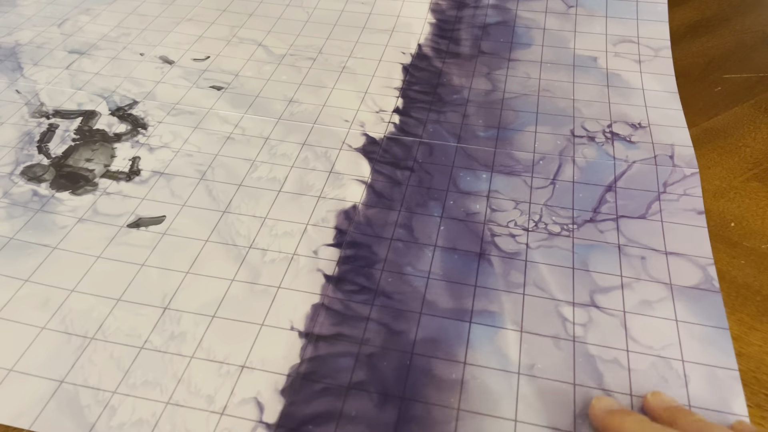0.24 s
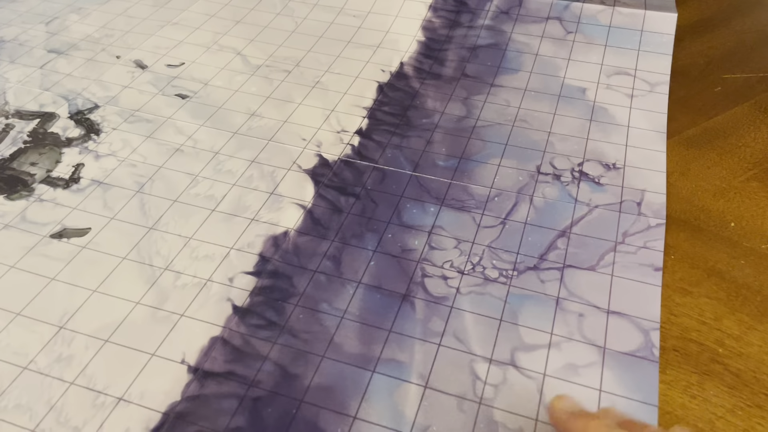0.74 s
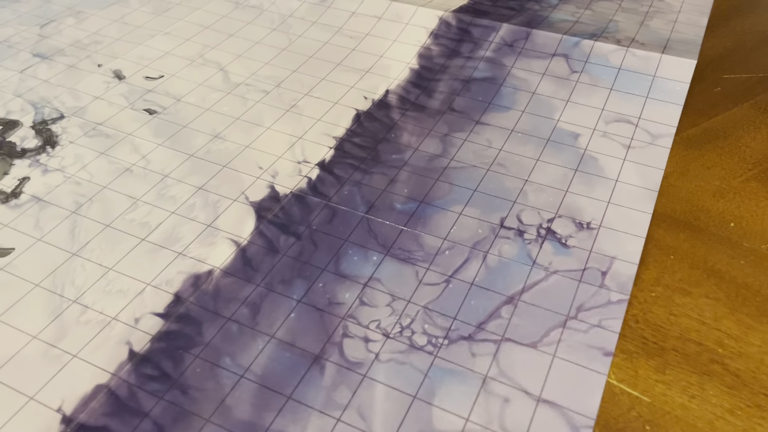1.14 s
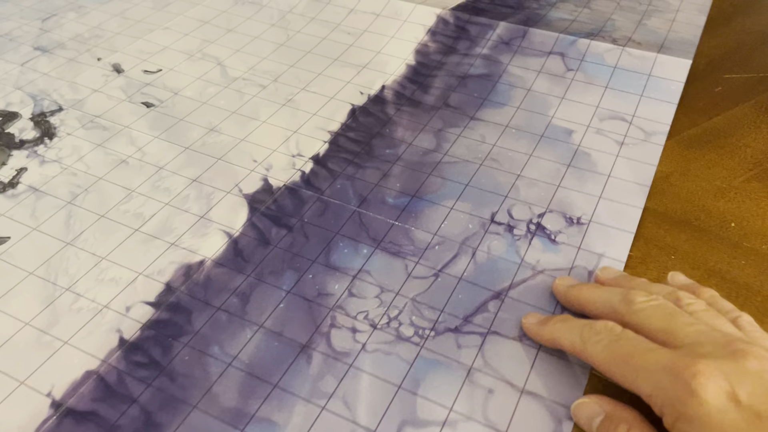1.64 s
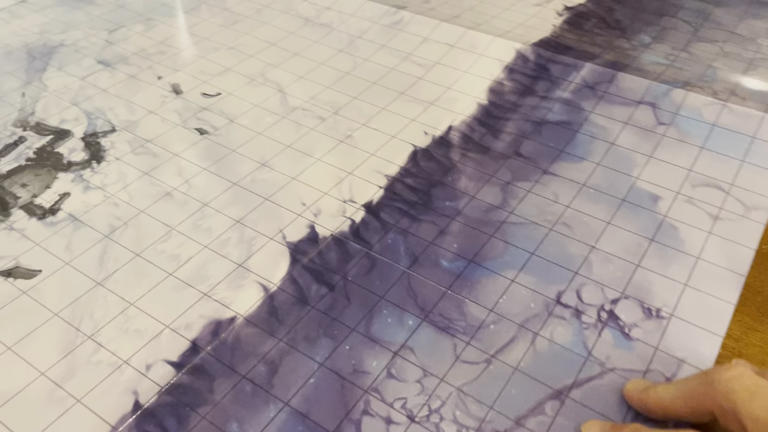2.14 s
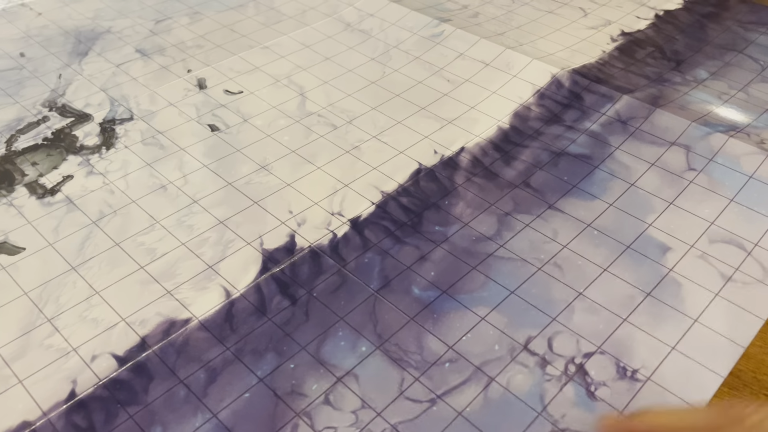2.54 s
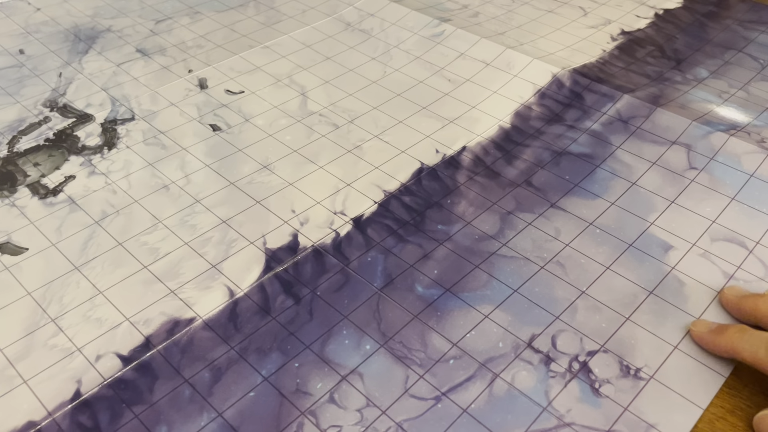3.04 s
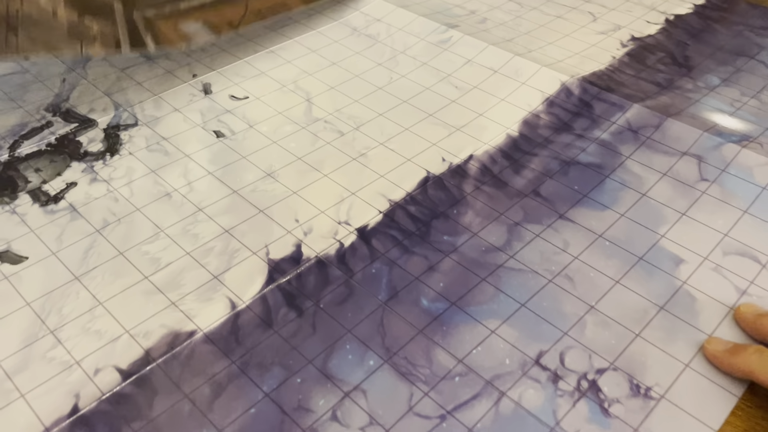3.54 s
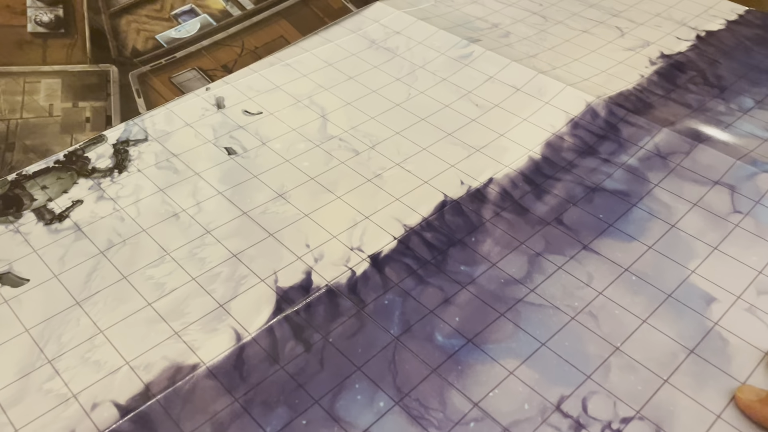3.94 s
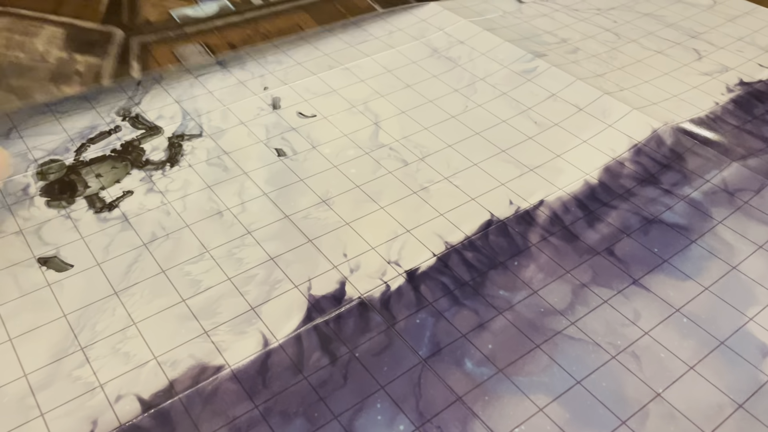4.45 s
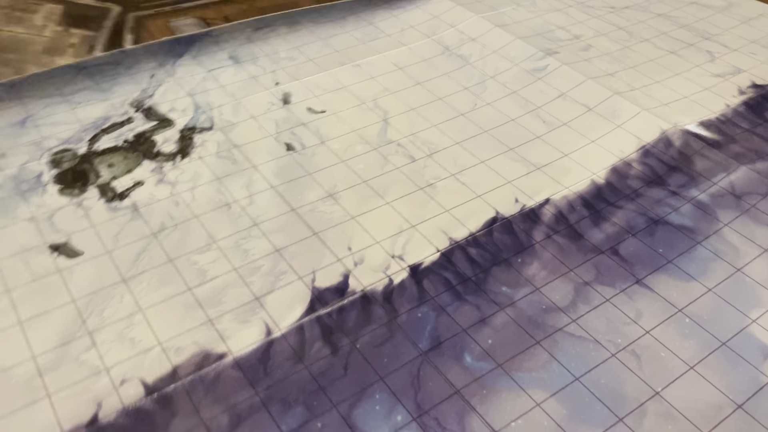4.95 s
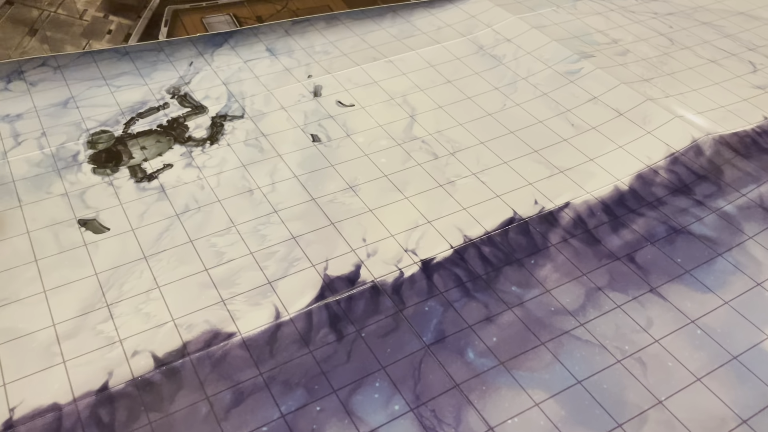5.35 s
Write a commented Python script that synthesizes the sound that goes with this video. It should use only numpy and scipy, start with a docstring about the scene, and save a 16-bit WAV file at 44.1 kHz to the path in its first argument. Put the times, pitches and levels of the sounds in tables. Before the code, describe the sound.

Stereo close recording of thick coated paper being pushed flat on a table. Soft hissing strokes with faint crinkles lead to a dull panel flip, a near-quiet pause, then a sharp crackling buckle with deep wobble. Sliding resumes with tiny skin-on-gloss squeaks, several smaller pops and thuds, and a crisp short swipe before it fades. Small room, faint low background.

```python
"""Small room, wooden table: a hand slides and presses a large, stiff, glossy paper map under a phone.
Sliding: random grains, coloured into hiss, sheen, fizz and drone; hard drags add gliding noise bands.
Bending: low grains wobble. Creases: noise bursts, ringing panels, sagging flaps, runs of crinkle pings.
Kinks ping, panels flip with a falling thump, bumps thud; brief squeaks are stick-slip pulse trains.
A short diffuse tail and a faint indoor background go with them into two microphones."""
import sys
import numpy as np
from scipy import signal
from scipy.fft import rfft, irfft, next_fast_len
from scipy.io import wavfile
from scipy.ndimage import uniform_filter1d, map_coordinates

SR = 44100
rng = np.random.default_rng(int(sys.argv[2]) if len(sys.argv) > 2 else 0)


def transcribe(signal):
    """Save signal, clipped to [-1, 1], as a 16-bit WAV file at the path in sys.argv[1]."""
    frames = np.atleast_2d(signal).T
    limited = np.clip(frames, -1, 1)
    pcm = np.round(limited * 32767).astype(np.int16)
    wavfile.write(sys.argv[1], SR, pcm)


N = 246959
TIME_S = np.arange(N) / SR
TAPS = 4096
FILTER_HZ = np.maximum(np.arange(TAPS + 1) * SR / (2 * TAPS), 1)
TOP_HZ, QUIET_DB = 14400, -62.5

# Event levels stand before any trim named in the function that plays them.
# pushes and brushes: start/s, end/s, attack/s, release/s, hiss level/dB,
# swell over stroke/dB (times growth), fizz level/dB, drone level/dB, sheen level/dB
STROKES = [(-0.02, 0.112, .02, 0.12, -52.5, -2, -47.5, -56.5, -58.5),
           (0.112, 0.307, 0.033, 0.028, -79.5, -3, -72.5, -98, -77.5),
           (0.249, 0.669, 0.18, 0.049, -56, -17.5, -56.5, -59, -58.5),
           (0.693, 0.824, .02, 0.02, -82, -13, -74, -100, -79.5),
           (0.774, 1.175, 0.22, 0.11, -52, 4, -58.5, -58, -57),
           (1.13, 1.347, 0.056, 0.036, -77, -11, -75, -84, -76.5),
           (1.344, 1.507, .03, 0.0183, -81, -8, -79, -86, -80),
           (1.464, 1.612, 0.12, 0.056, -56, 9, -65.5, -60.5, -57),
           (1.553, 2.32, 0.41, 0.11, -52.5, -4.5, -56.5, -55.5, -53.5),
           (2.056, 2.574, 0.15, 0.063, -54, 2.5, -59.5, -55.5, -52),
           (2.872, 3.137, 0.071, 0.0524, -76.5, 9, -82, -71, -88),
           (3.217, 3.362, 0.044, 0.034, -76.5, -3, -82, -72.5, -92),
           (3.33, 3.5, 0.099, 0.091, -67, -15, -73, -57, -74),
           (3.397, 4.18, 0.15, 0.45, -56.5, 11, -63.5, -54.5, -60),
           (3.933, 4.538, 0.32, 0.19, -53.5, -1, -59, -56.5, -53.5),
           (4.298, 4.473, 0.022, 0.064, -72, -9, -83, -55, -66),
           (4.543, 4.78, 0.034, 0.05, -70, -6, -86, -61.5, -85),
           (4.81, 4.904, 0.015, 0.05, -68.5, -4, -86, -65, -75),
           (4.887, 5.171, 0.069, 0.074, -46, -4, -50.5, -59, -47),
           (5.18, 5.354, 0.034, 0.042, -60, 4, -74, -73.5, -83),
           (5.322, 5.485, 0.039, 0.043, -68.5, 3, -80.5, -91, -79.5),
           (5.528, 5.65, 0.024, .03, -87, 5, -70.5, -95, -79)]
# power of the push for hiss, fizz, drone, sheen [1]: drone comes up first, fizz last
PUSH_GROWTH = (1.08, 1.31, 0.61, 1.13)
# bending of the whole sheet: t/s, level/dB
BENDING_LEVEL = [(0.0, -87), (0.3, -62), (0.5, -58.5), (0.8, -71), (1.04, -62.5), (1.36, -71), (2.1, -57.5),
                 (2.5, -60), (2.78, -73), (2.95, -53.5), (3.18, -62.5), (3.65, -47.5), (4.15, -77),
                 (4.44, -52), (4.65, -53), (5.22, -60), (5.38, -74), (5.6, -72.5)]
# panels flipping over: t/s, length/s, peak level/dB, first f/Hz, f approached/Hz, fall time/s
FLIPS = [(0.0855, 0.0099, -42.5, 700, 160, 0.0031), (1.345, 0.012, -49.5, 1915, 200, 0.0062),
         (1.603, .02, -52, 448, 120, 0.018), (2.5631, 0.028, -26, 1515, 58, 0.0031),
         (3.346, 0.01, -47.5, 1195, 160, 0.00396), (3.519, 0.016, -40, 800, 80, 0.0053),
         (3.8522, 0.02, -25.5, 2200, 162, 0.00351), (4.662, 0.029, -31, 1580, 92, 0.00243)]
# soft bumps on the table: t/s, level/dB, mid-sag f/Hz
BUMPS = [(0.092, -51.5, 189), (0.252, -45, 80), (1.268, -53, 112), (1.359, -52, 130.5), (1.385, -53, 75),
         (2.487, -45, 148), (2.518, -42.5, 112), (2.615, -36.5, 72.5), (2.935, -44, 101),
         (2.999, -47.5, 215), (3.064, -47.5, 175), (3.568, -41.5, 196), (3.853, -30.5, 89),
         (3.862, -36, 301), (4.43, -46, 108), (4.521, -43.5, 100), (4.623, -38.5, 76), (4.622, -49, 285),
         (4.762, -44, 81), (5.075, -44, 203)]
# creases snapping: t/s, crack level/dB, tick level/dB, ring level/dB, flap level/dB,
# mid-sag flap f/Hz, crack f/Hz, ring f/Hz
SNAPS = [(0.238, -64, -60, -61.5, -58, 110, 6040, 520), (0.682, -79, -84, -69.5, -63, 65, 2150, 440),
         (0.817, -64, -80, -63.5, -72, 85.5, 6100, 645), (1.164, -66, -74, -64, -65, 108, 6300, 900),
         (1.344, -60.5, -86, -54.5, -60, 243, 2260, 673), (1.57, -58, -61.5, -61, -55, 92, 5230, 764),
         (1.62, -56, -65, -63, -45, 71, 2460, 689), (2.565, -55.5, -85, -46.5, -47, 88.5, 1400, 710),
         (2.912, -57.5, -69.5, -68, -46, 65, 4730, 473), (2.942, -71, -85, -79, -53, 109, 3200, 450),
         (3.267, -76, -95, -62, -54.5, 129, 1600, 850), (3.343, -63, -81, -55, -51, 204, 2200, 560),
         (3.515, -54, -83, -53, -41, 89, 1940, 430), (3.551, -47, -50.5, -40, -36.5, 258.6, 2910, 947),
         (3.554, -43, -68, -41, -44, 131, 2300, 702), (3.695, -56, -75.5, -52, -44.5, 81.7, 2000, 506),
         (3.705, -50, -72, -47.5, -41.5, 78, 3060, 495), (3.816, -47.5, -60, -53, -54.5, 293, 2383, 430),
         (3.829, -49, -65, -38.5, -41.5, 281, 2200, 592), (3.845, -38.5, -46, -33.5, -33, 297, 3250, 430),
         (3.853, -38.5, -45.5, -30, -33.5, 217.3, 3350, 600),
         (4.574, -56.5, -73, -52.5, -44.5, 132, 4000, 430), (4.595, -56, -68.5, -50, -40.5, 144, 2500, 559),
         (4.661, -43, -58, -39.5, -39, 133, 1630, 534), (4.737, -64, -70, -57.5, -54, 129, 2280, 602),
         (4.812, -54.5, -66, -53, -41, 163, 1630, 462), (5.123, -51, -72, -62, -42.5, 147.6, 2480, 624),
         (5.139, -54.5, -57, -62, -50.5, 183, 5050, 560), (5.538, -80, -65.5, -93, -56.5, 107, 6900, 560)]
# kinks popping: t/s, level/dB, f/Hz, t60/s
POPS = [(0.2385, -59, 10500, .002), (0.251, -61.5, 6550, .003), (0.2507, -55.5, 11000, .002),
        (0.684, -76, 2270, 0.0052), (0.818, -62, 6100, .008), (1.165, -72, 6300, 0.0018),
        (1.167, -62, 870, 0.011), (1.267, -72, 4400, .012), (1.3, -74, 4400, 0.0079),
        (1.345, -59.5, 2390, .012), (1.526, -65, 3840, .004), (1.622, -57, 2430, .014),
        (1.623, -62, 820, .02), (2.5656, -48, 940, .014), (2.943, -64.5, 3250, .01),
        (3.069, -61.5, 1140, .014), (3.269, -66, 840, .014), (3.515, -51.5, 1900, 0.0085),
        (3.553, -42.5, 940, .014), (3.695, -51.5, 1900, .008), (3.812, -51.5, 2700, .015),
        (3.816, -44, 2250, .022), (3.825, -46, 2400, .014), (3.829, -44.5, 735, 0.012),
        (3.8455, -32.5, 3070, 0.0029), (3.8452, -33.5, 660, .016), (3.8453, -43.5, 6400, 0.0025),
        (3.8518, -44.5, 3380, .014), (3.852, -36.5, 974, .018), (4.52, -60.5, 1520, .008),
        (4.575, -60, 4170, 0.0037), (4.621, -62, 2600, .008), (4.6625, -51.5, 5870, 0.0038),
        (4.738, -56.5, 3300, 0.0015), (4.811, -64, 1830, 0.0079)]
# hard drags: start/s, end/s, first f/Hz, last f/Hz, level/dB
RASPS = [(0.25, 0.47, 949, 1080, -66), (1.16, 1.317, 11910, 13300, -71.5), (1.61, 1.899, 2380, 2650, -63.5),
         (1.721, 1.955, 600, 1300, -60), (2.118, 2.28, 5200, 4550, -54.5), (2.12, 2.476, 760, 815, -63.5),
         (3.127, 3.201, 780, 995, -78), (4.101, 4.345, 1177, 1076, -67), (4.141, 4.439, 6600, 6180, -54.5),
         (4.36, 4.442, 1680, 1442, -57), (4.351, 4.442, 930, 968, -57), (4.441, 4.51, 1100, 616, -58),
         (5.164, 5.28, 12500, 11700, -67)]
# creases crinkling: t/s, length/s, level/dB, centre f/Hz
CRINKLES = [(0.801, 0.064, -69.5, 10900), (0.865, 0.065, -58.5, 11000), (1.103, 0.014, -54, 11600),
            (1.339, 0.018, -63, 1130), (3.048, 0.042, -67.5, 2800), (3.057, 0.034, -65, 960),
            (3.389, 0.0366, -65.5, 1120), (3.556, 0.045, -68, 3000), (3.575, .11, -58, 796),
            (3.58, .1, -49.5, 240), (3.695, .004, -53.5, 2000), (3.708, .02, -55.5, 2900),
            (3.815, 0.024, -45, 2490), (3.816, .02, -44, 1450), (3.853, 0.04, -39, 533),
            (3.856, 0.033, -52.5, 2900), (4.309, .04, -52.5, 475), (4.606, .024, -48, 715),
            (4.617, .014, -56, 2400), (4.631, .028, -57.5, 960), (4.668, 0.035, -56, 1760),
            (4.668, 0.042, -53, 520)]
# stick-slip: start/s, length/s, first, middle, last slip rate/Hz, jitter [0-1], level/dB
SQUEAKS = [(3.957, 0.1, 385, 420.4, 558, .025, -45), (4.32, .036, 480, 420, 350, .08, -56.5),
           (4.355, .08, 532, 551, 585, 0.057, -53.5), (4.444, .06, 535, 440, 306, 0.0595, -54)]
# stiff panel resonances: f/Hz, width/Hz, level/dB
PANEL_MODES = [(207, 12, 5), (309.6, 65, 7), (431, 12, 3), (554, 19, 0), (660, 40, -4), (830, 45, -5.5),
               (1076, 38, -2.5)]

# relative spectra, each: f/Hz, level/dB
# fine micro-slips
HISS_SPECTRUM = [(600, -8.5), (1300, 2.5), (1800, -1), (2400, -1), (3400, 1), (5000, -3.5), (7000, -2.5),
                 (8500, -15), (10000, -16.5), (15000, -31.5)]
# sheen over the hiss
SHEEN_SPECTRUM = [(2500, -49.5), (3800, -5.5), (5200, 0), (6500, -5.5), (8000, -4.5), (11000, -26.5)]
# highest treble: fizz and ticks
FIZZ_SPECTRUM = [(5000, -26.5), (7000, -6), (8400, 1), (10500, -2.5), (13000, -6), (15500, -1.5)]
# coarse catches
DRONE_SPECTRUM = [(70, -18.5), (170, 4), (330, -1.5), (480, -2), (780, 1), (1100, -8), (1600, -17.5),
                  (3200, -17), (5000, -43.5)]
# bending sheet
WOBBLE_SPECTRUM = [(20, -49), (38, -8), (62, 5), (85, -6.5), (120, -3), (180, -5.5), (260, -10), (400, -16),
                   (800, -54)]
# crease cracks and grit
CRACK_SPECTRUM = [(700, -34.5), (1400, 3.5), (1900, -3), (2300, 2), (3400, -1), (4000, -0.5), (6300, -3.5),
                  (7500, -4), (10000, -22)]
# ringing panels
RING_SPECTRUM = [(130, -5.5), (300, -1.5), (560, -3.5), (900, -2.5), (1150, -5), (1500, -26.5),
                 (3000, -38.5)]
# squeaks
SQUEAK_SPECTRUM = [(200, -5), (430, 5.5), (850, -4), (1300, -9.5), (1600, -8.5), (1900, -29), (4000, -53)]
# indoor background
QUIET_SPECTRUM = [(20, -3), (40, -6), (75, -0.5), (150, -10), (300, -29), (630, -32), (2000, -41.5),
                  (7000, -46), (15000, -50.5)]

# room tail: f/Hz, reflected level/dB, t60/s
ROOM_BANDS = [(80, -9, 0.13), (251, -11, 0.28), (560, -11.5, 0.22), (1500, -7.5, 0.29), (3080, -11.5, 0.31),
              (6000, -12, 0.26), (13000, -11.5, 0.18)]
# two microphones: f/Hz, likeness [0-1], left minus right/dB
PORTS = [(100, 0.96, 2.5), (300, 0.91, 2.5), (600, 0.47, 5.5), (1110, 0.36, 3.5), (1810, 0.12, 2),
         (3600, 0.66, 3), (5220, 0.38, 4.5), (6230, 0.77, 1.5), (8000, 1, -1), (10400, 0.46, 0),
         (11200, 0.95, 0.5), (13200, 0.9, -1), (14400, 1, 0.5)]
# phase lead of the right channel: f/Hz, lead/rad
RIGHT_LEAD = [(100, 0), (800, -.4), (3800, 0), (5100, -.6), (7000, 1.5), (7800, 3.0), (8600, 3.4),
              (11000, 6.2), (12200, 6.4), (14200, 9.2), (15800, 9.5)]


def undb(db):
    """Decibels to gain."""
    return 10 ** (np.asarray(db) / 20)


def unit(x):
    """Scale to rms 1."""
    return x / np.sqrt(np.mean(x ** 2) + 1e-20)


def energy_10ms(x):
    """Scale to the energy of 10 ms at rms 1."""
    return unit(x) * np.sqrt(SR / 100 / x.shape[-1])


def common(x, apart=0):
    """Two rows: shared by the microphones, and setting them apart."""
    return x * np.array([[1], [apart]])


def colour(x, points):
    """Minimum-phase filter through (f/Hz, level/dB) points; keeps the power of white noise."""
    hz, db = np.transpose(points)
    gain = unit(undb(np.interp(np.log(FILTER_HZ), np.log(hz), db)))
    cepstrum = irfft(np.log(gain))
    cepstrum[1:TAPS] *= 2  # fold to causal
    cepstrum[TAPS + 1:] = 0
    response = irfft(np.exp(rfft(cepstrum)))[:TAPS]
    return signal.oaconvolve(x, response[None], axes=1)[:, :N]


def resonate(x, hz, width_hz):
    """One resonance, gain 1 at its centre."""
    return signal.lfilter(*signal.iirpeak(hz, hz / width_hz, fs=SR), x)


def walk(rate_hz):
    """Random level, rms near 1, sliding linearly to rate_hz new values per second."""
    hold = max(int(SR / rate_hz), 1)
    steps = np.repeat(rng.standard_normal(N // hold + 1), hold)
    return unit(uniform_filter1d(steps, hold)[:N])


def grains(rate_hz, spread_db):
    """Tiny slips of uneven size at random moments, on two unrelated parts of the sheet."""
    hits = rng.random((2, N)) < rate_hz / SR
    sizes = rng.standard_normal((2, N)) * undb(spread_db * rng.standard_normal((2, N)))
    return unit(hits * sizes)


def fade(t, t60_s):
    """Exponential decay from t = 0."""
    return (t >= 0) * undb(-60 * np.maximum(t, 0) / t60_s)


def swell(t, start, end, attack, release):
    """Smooth rise, hold and fall."""
    rise, fall = np.clip([(t - start) / attack, (end - t) / release], 0, 1)
    return rise ** 2 * (3 - 2 * rise) * fall ** 2 * (3 - 2 * fall)


def add(track, start_s, x):
    """Mix x into every row of the track."""
    i = max(int(start_s * SR), 0)
    track[:, i:i + x.shape[-1]] += x[..., :N - i]


def pushes():
    """Strength of hiss, fizz, drone and sheen; overlapping strokes add in power."""
    power = np.zeros((4, N))
    for start, end, attack, release, hiss, swell_db, fizz, drone, sheen in STROKES:
        on = slice(max(int(start * SR), 0), int(end * SR))
        t = TIME_S[on]
        tilt = undb(swell_db * ((t - start) / (end - start) - .5))
        push = swell(t, start, end, attack, release) * tilt
        levels = zip((hiss, fizz, drone, sheen), PUSH_GROWTH)
        power[:, on] += [(undb(db) * push ** growth) ** 2 for db, growth in levels]
    return np.sqrt(power)


def swish(x, lag_s, wander, echo):
    """A glance off the moving sheet adds a late copy; its wandering lag shifts the colour."""
    lag = lag_s * np.exp(wander * walk(4))
    late = np.array([map_coordinates(row, [(TIME_S - lag) * SR], order=1) for row in x])
    return (x + echo * late) / np.sqrt(1 + echo ** 2)


def sliding(hiss_db=-2.5, sheen_db=-3.0, fizz_db=2.0, drone_db=1.0, grit_db=-13,
            judder_db=1.27, drift_db=0.82):
    """Dense micro-slips hiss, gleam and fizz; coarser catches drone and specks of grit scratch."""
    drift = drift_db * np.array([walk(12) for _ in PUSH_GROWTH])
    hiss, fizz, drone, sheen = pushes() * undb(judder_db * walk(45) + drift)
    fine = colour(grains(9000, spread_db=0.5) * hiss * undb(hiss_db), HISS_SPECTRUM)
    grit = colour(grains(74, spread_db=1.0) * hiss * undb(grit_db), CRACK_SPECTRUM)
    gleam = colour(grains(7000, spread_db=0.0) * sheen * undb(sheen_db), SHEEN_SPECTRUM)
    fizzing = colour(grains(14000, spread_db=2.0) * fizz * undb(fizz_db), FIZZ_SPECTRUM)
    coarse = colour(grains(2800, spread_db=1.0) * drone * undb(drone_db), DRONE_SPECTRUM)
    bright = swish(fine + gleam + grit, lag_s=0.001305, wander=0.209, echo=0.44)
    dark = swish(coarse, lag_s=0.003095, wander=0.27, echo=0.39)
    return bright + dark + fizzing


def bending(flutter_db=3.0):
    """The wide sheet wobbles in soft, irregular buckles."""
    level_db = np.interp(TIME_S, *np.transpose(BENDING_LEVEL))
    buckles = grains(1200, spread_db=1.5) * undb(level_db + flutter_db * walk(24))
    return colour(buckles, WOBBLE_SPECTRUM)


def background():
    """Faint steady indoor noise, mostly low."""
    return undb(QUIET_DB) * colour(rng.standard_normal((2, N)), QUIET_SPECTRUM)


def room(x, gap_s=0.0049):
    """Table and walls return a short, diffuse tail: noise with a decay per band."""
    t = np.arange(SR // 3) / SR - gap_s
    hz, db, t60_s = np.transpose(ROOM_BANDS)
    bins = np.log(np.maximum(np.arange(len(t) // 2 + 1) * SR / len(t), 1))
    noise, response = rfft(rng.standard_normal((2, len(t)))), 0
    for k, share in enumerate(np.eye(len(hz))):  # triangular bands
        band = irfft(noise * np.interp(bins, np.log(hz), share), len(t))
        response = response + undb(db[k]) * band * unit(fade(t, t60_s[k]))
    return signal.oaconvolve(x, response / np.sqrt(len(t)), axes=1)[:, :N]


def flipping(rise_share=0.36, release_share=0.53):
    """A flipped panel sends one bending wave: treble arrives first, so it sweeps down to a thump."""
    out = np.zeros((2, N))
    for start, length, level_db, first_hz, last_hz, fall_s in FLIPS:
        t = np.arange(int(length * SR)) / SR
        hz = last_hz + (first_hz - last_hz) / (1 + t / fall_s) ** 2
        shape = np.sqrt(swell(t, 0, length, length * rise_share, length * release_share))
        wave = np.sin(2 * np.pi * np.cumsum(hz) / SR)
        add(out[:1], start, undb(level_db) * shape * wave)
    return out


def flap(t, hz, t60_s=0.18, rise_s=0.0018, sag=0.6, sag_s=0.019, under_db=-10):
    """Paper swings to rest; slow bending waves come late, so its pitch sags."""
    turn = 2 * np.pi * np.cumsum(hz * (1 + sag * (np.exp(-t / sag_s) - .5))) / SR
    swing = np.sin(turn) * fade(t, t60_s)
    under = undb(under_db) * np.sin(0.632 * turn) * fade(t, 2 * t60_s)
    return energy_10ms((swing + under) * (1 - np.exp(-t / rise_s)))


def bumping():
    """The sheet meets the table on a cushion of air: a dull thud without a crack."""
    t, out = np.arange(SR // 4) / SR, np.zeros((2, N))
    for start, level_db, hz in BUMPS:
        thud = flap(t, hz, t60_s=0.11, rise_s=0.0017, sag=0.13)
        add(out, start, undb(level_db) * common(thud))
    return out


def burst(t, t60_s, rattle_db, rattle_t60_s, rise_s=0.00016):
    """A sharp release of noise and the chatter of paper after it."""
    decay = fade(t, t60_s) + undb(rattle_db) * fade(t, rattle_t60_s)
    shape = decay * (1 - np.exp(-t / rise_s))
    return energy_10ms(rng.standard_normal((2, len(t))) * shape)


def lean_left(x, share):
    """Feeding the common row into the other raises the left microphone and lowers the right."""
    return np.array([x[0], share * x[0] + np.sqrt(1 - share ** 2) * x[1]])


def disperse(x, lag_s=0.002044):
    """Bending waves travel as the root of frequency, so lows arrive late."""
    size = next_fast_len(N + TAPS, real=True)
    bins = np.arange(size // 2 + 1) * SR / size
    # lag_s: travel time at 1 kHz; delays count from the 6 kHz arrival
    turns = lag_s * (2 * np.sqrt(1000 * bins) - bins / np.sqrt(6))
    return irfft(rfft(x, size) * np.exp(-2j * np.pi * turns), size)[:, :N]


def snapping(crack_db=-2, pitch_db=2, crack_width_hz=700, tick_db=5.0, ring_db=-3, facet_db=2,
             facet_width_hz=110, modes_db=-1, boom_db=-5.5, boom_hz=76, ring_lag_s=0.00029):
    """Each crease cracks at its own pitch; the panel rings and flaps, the whole sheet booms."""
    t = np.arange(SR // 4) / SR
    cracks, ticks, rings, flaps = np.zeros((4, 2, N))
    for start, crack, tick, ring, swing, flap_hz, crack_hz, ring_hz in SNAPS:
        release = undb(crack + crack_db) * burst(t, 0.012, rattle_db=-12.5, rattle_t60_s=0.13)
        pitched = undb(pitch_db) * resonate(release, crack_hz, crack_width_hz)
        add(cracks, start, release + pitched)
        click = burst(t, 0.012, rattle_db=-9.5, rattle_t60_s=0.088)
        add(ticks, start, undb(tick + tick_db) * click)
        shake = undb(ring + ring_db) * burst(t, 0.043, rattle_db=-22.5, rattle_t60_s=0.15)
        facet = undb(facet_db) * resonate(shake, ring_hz, facet_width_hz)
        add(rings, start + ring_lag_s, shake + facet)
        boom = flap(t, boom_hz, rise_s=0.024, sag=0.2, under_db=-25)
        waves = flap(t, flap_hz) + undb(boom_db) * boom
        add(flaps, start, undb(swing) * common(waves))  # long waves reach both alike
    rings = lean_left(colour(rings, RING_SPECTRUM), share=0.41)
    modes = sum(undb(db) * resonate(rings, hz, width_hz) for hz, width_hz, db in PANEL_MODES)
    travelled = disperse(colour(cracks, CRACK_SPECTRUM) + rings + undb(modes_db) * modes)
    return travelled + colour(ticks, FIZZ_SPECTRUM) + flaps


def popping(apart=0.3):
    """One kink pops through and rings a small facet as a short decaying sine."""
    t, out = np.arange(SR // 25) / SR, np.zeros((2, N))
    for start, level_db, hz, t60_s in POPS:
        ping = energy_10ms(np.sin(2 * np.pi * hz * t) * fade(t, t60_s))
        add(out, start, undb(level_db) * common(ping, apart))
    return out


def rasping(width_share=0.206, rough_db=3.0, edge_share=0.34):
    """Where the sheet drags hard, the contact patch rings; pitch glides as it grows or shrinks."""
    out, grip = np.zeros((2, N)), undb(rough_db * walk(110))
    for start, end, first_hz, last_hz, level_db in RASPS:
        on = slice(int(start * SR), int(end * SR))
        t, length = TIME_S[on], end - start
        hz = first_hz * (last_hz / first_hz) ** ((t - start) / length)
        lowpass = signal.butter(2, width_share * first_hz / 2, fs=SR, output="sos")
        band = signal.sosfilt(lowpass, rng.standard_normal((2, 2, len(hz))))
        carrier = np.exp(2j * np.pi * np.cumsum(hz) / SR)
        ring = np.real((band[0] + 1j * band[1]) * carrier)
        shape = swell(t, start, end, length * edge_share, length * edge_share)
        out[:, on] += unit(ring * grip[on]) * undb(level_db) * shape
    return out


def crinkling(rate_hz=900, cycles=10, pitch_spread=0.27, size_spread_db=4, fall_db=6, trim_db=-1.5):
    """A fold gives way in a weakening run of tiny buckles; each rings its own facet of paper."""
    t, out = np.arange(SR // 50) / SR, np.zeros((2, N))
    for start, length, level_db, centre_hz in CRINKLES:
        count = max(int(rate_hz * length), 1)
        for k, (late, pitch, size, side) in enumerate(rng.standard_normal((count, 4))):
            hz = min(centre_hz * np.exp(pitch_spread * pitch), .35 * SR)
            ping = unit(np.sin(2 * np.pi * hz * t) * fade(t, cycles / hz))
            ping = ping / np.sqrt(rate_hz * t[-1])  # level holds over the whole run
            moment = start + length * (k + .5 + late / 2) / count
            ping_db = level_db + trim_db + size_spread_db * size - fall_db * (k / count - .5)
            add(out, moment, undb(ping_db) * common(ping, side))
    return out


def squeaking(patchy_db=2.0, edge_share=0.28):
    """The glossy surface sticks and slips: filtered slip impulses whose rate follows a curve."""
    out, wobble, grip = np.zeros((2, N)), walk(300), undb(patchy_db * walk(70))
    for start, length, first_hz, middle_hz, last_hz, jitter, level_db in SQUEAKS:
        on = slice(int(start * SR), int((start + length) * SR))
        t = TIME_S[on]
        bend = np.polyfit([0, .5, 1], [first_hz, middle_hz, last_hz], 2)
        hz = np.polyval(bend, (t - start) / length)
        phase = np.cumsum(hz * (1 + jitter * wobble[on])) / SR
        slips = np.diff(np.floor(phase), prepend=0)  # one impulse per slip
        shape = swell(t, start, start + length, length * edge_share, length * edge_share)
        out[0, on] += unit(slips - hz / SR) * undb(level_db) * shape * grip[on]
    return colour(out, SQUEAK_SPECTRUM)


def microphones(x):
    """First row reaches both, second sets them apart; a fixed right-channel lead widens the treble."""
    size = next_fast_len(N + TAPS, real=True)
    bins = np.arange(size // 2 + 1) * SR / size
    hz, *columns = np.transpose(PORTS)
    likeness, lean_db = (np.interp(bins, hz, c) for c in columns)
    likeness = np.clip(likeness, 0, 1)
    shares = np.sqrt(np.array([1 + likeness, 1 - likeness]) / 2)
    shared, apart = rfft(x, size) * shares
    lead_rad = np.interp(bins, *np.transpose(RIGHT_LEAD))
    left = (shared + apart) * undb(lean_db / 2)
    right = (shared - apart) * undb(-lean_db / 2) * np.exp(1j * lead_rad)
    return irfft(np.array([left, right]), size)[:, :N]


def scene():
    """Sheet, room tail and background, as a shared and a differing row, into two microphones."""
    sheet = sliding() + bending() + flipping() + bumping() + snapping()
    sheet = sheet + popping() + rasping() + crinkling() + squeaking()
    return microphones(sheet + room(sheet) + background())


def record(dry):
    """High-pass at 36 Hz and low-pass at TOP_HZ."""
    lean = signal.sosfilt(signal.butter(4, 36, "high", fs=SR, output="sos"), dry)
    return signal.sosfilt(signal.ellip(8, .2, 70, TOP_HZ, fs=SR, output="sos"), lean)


dry = scene()
out = record(dry)
transcribe(out)
```